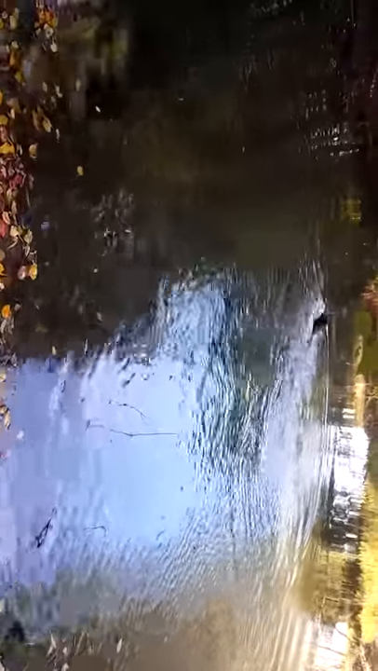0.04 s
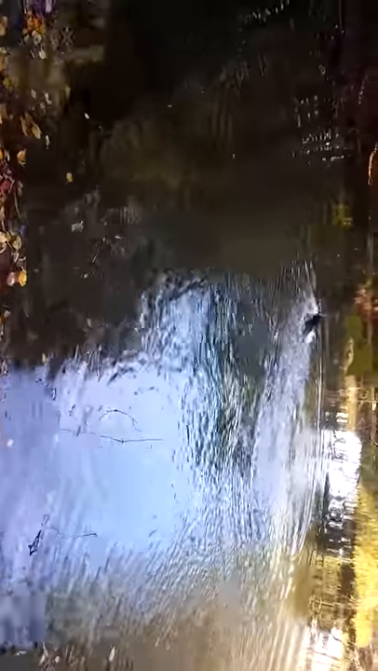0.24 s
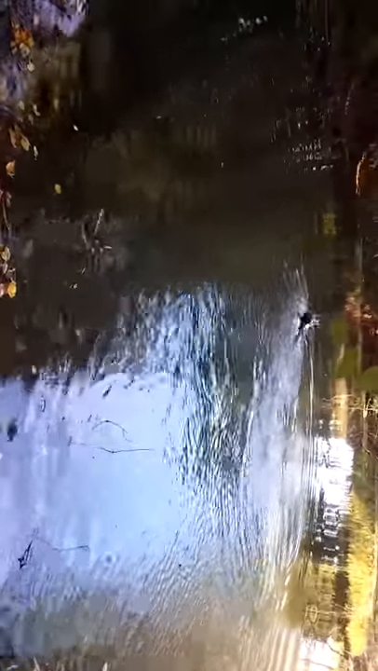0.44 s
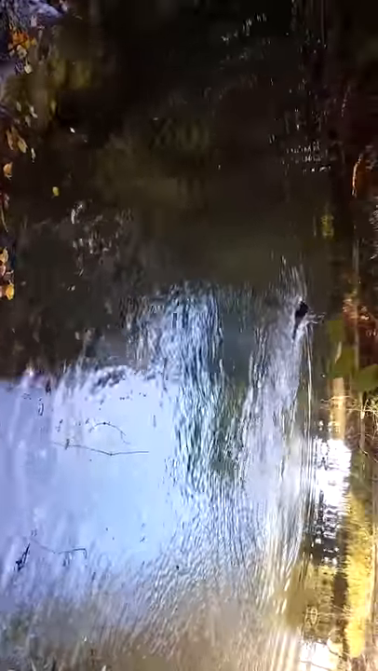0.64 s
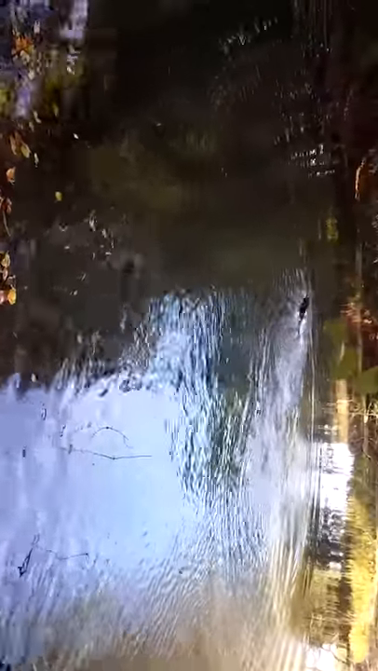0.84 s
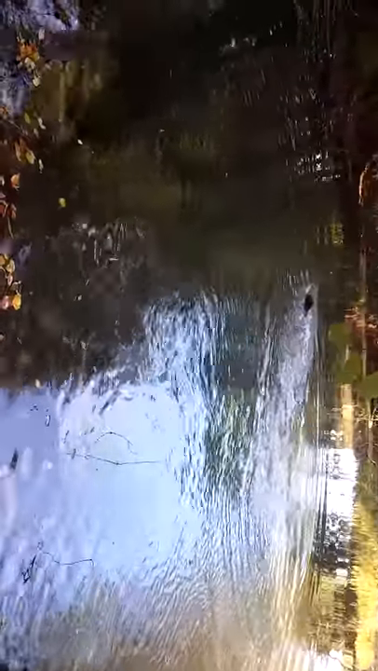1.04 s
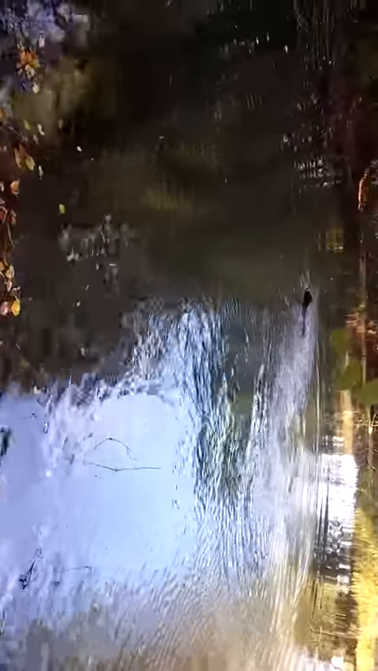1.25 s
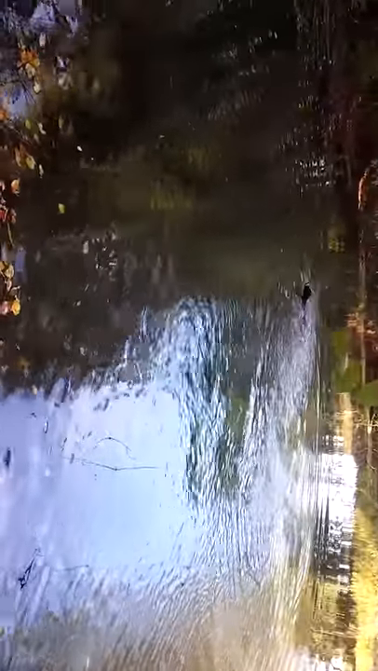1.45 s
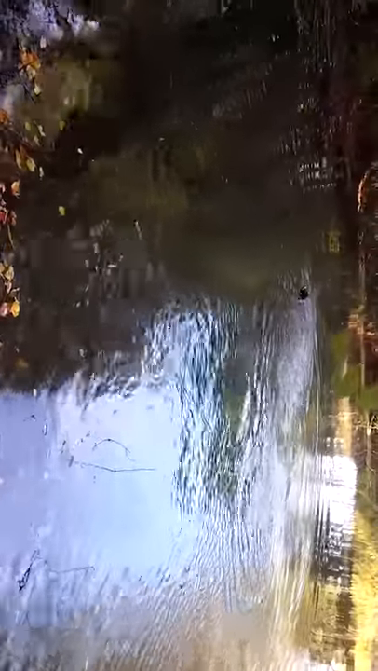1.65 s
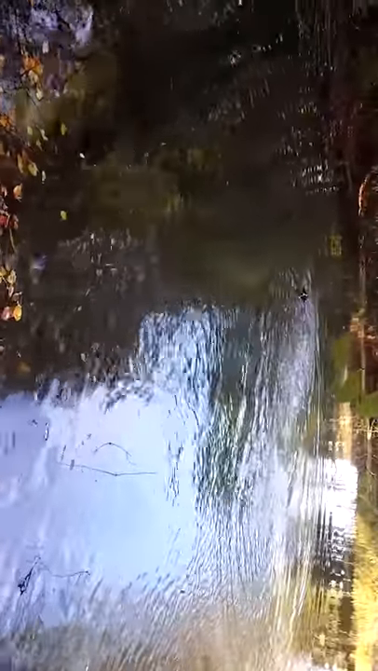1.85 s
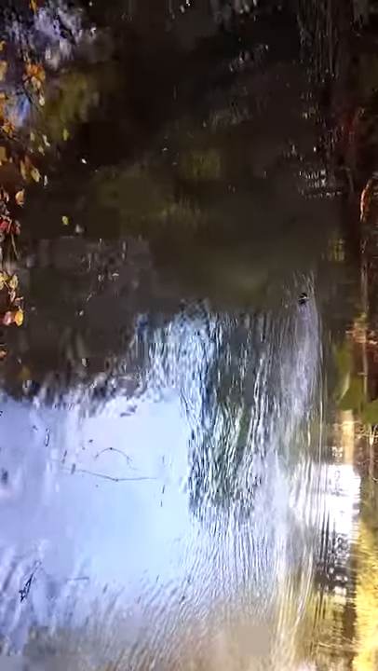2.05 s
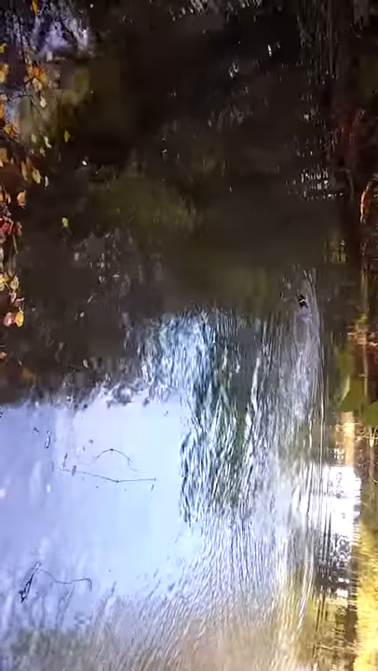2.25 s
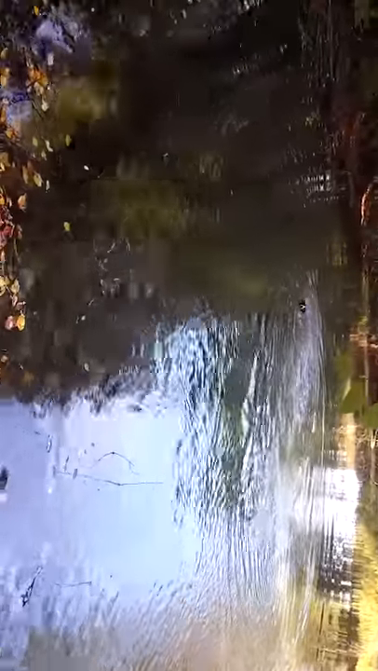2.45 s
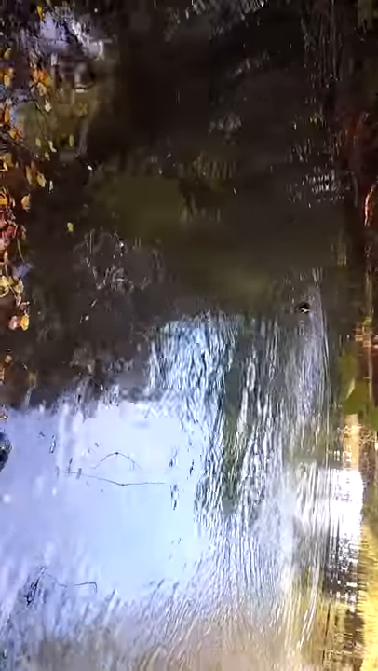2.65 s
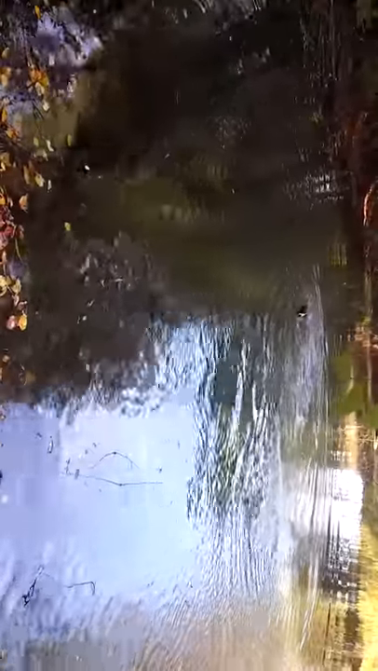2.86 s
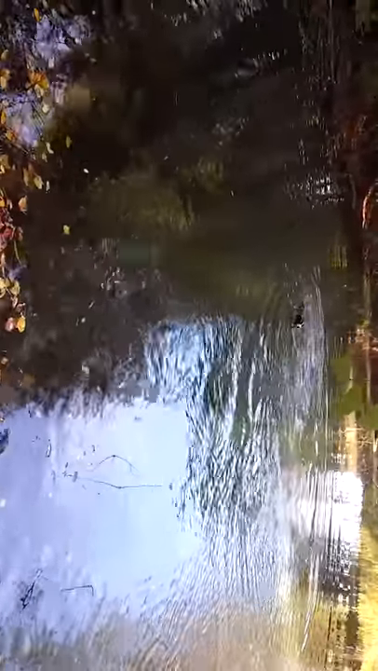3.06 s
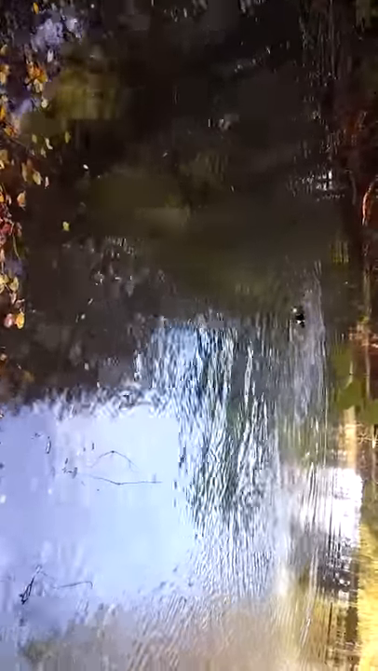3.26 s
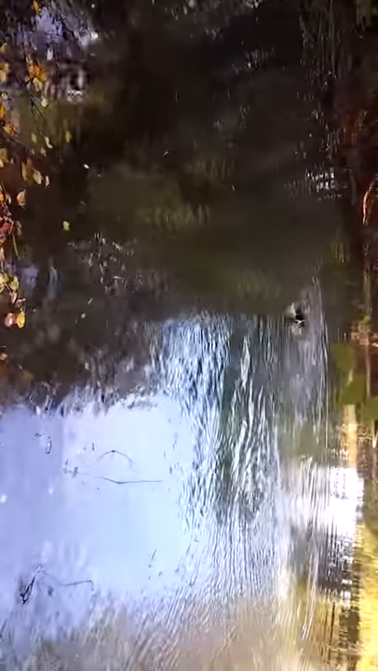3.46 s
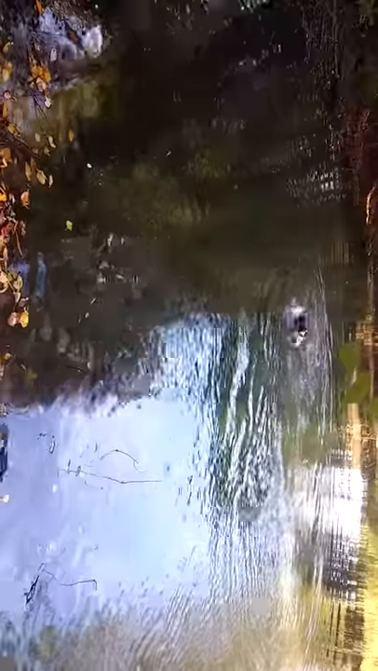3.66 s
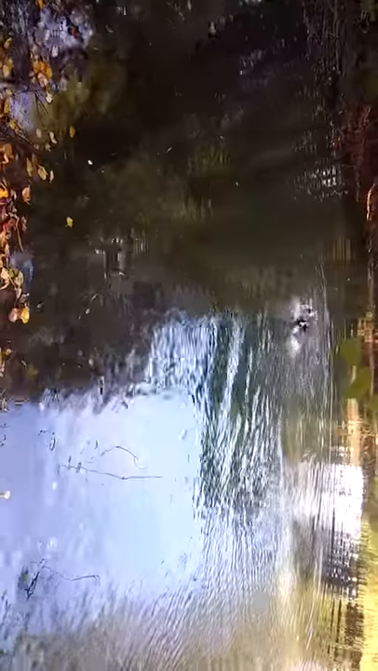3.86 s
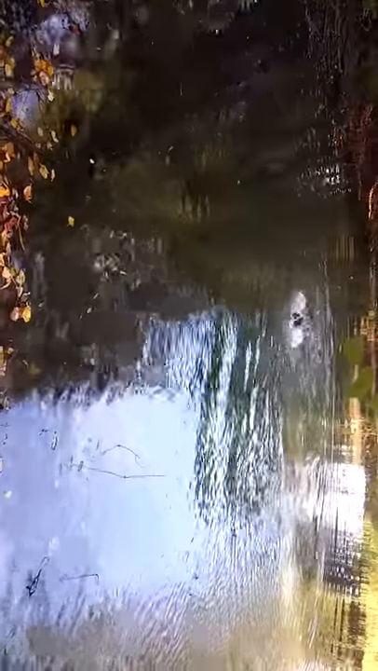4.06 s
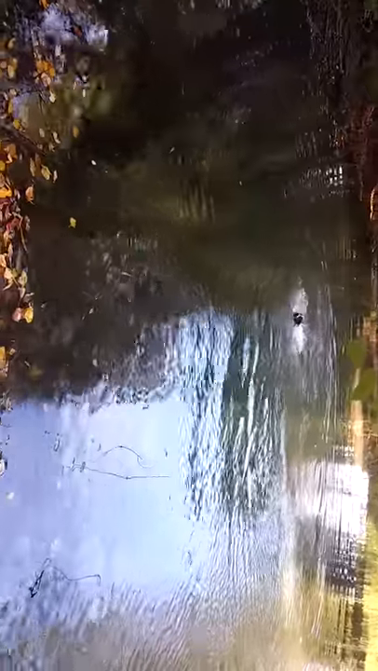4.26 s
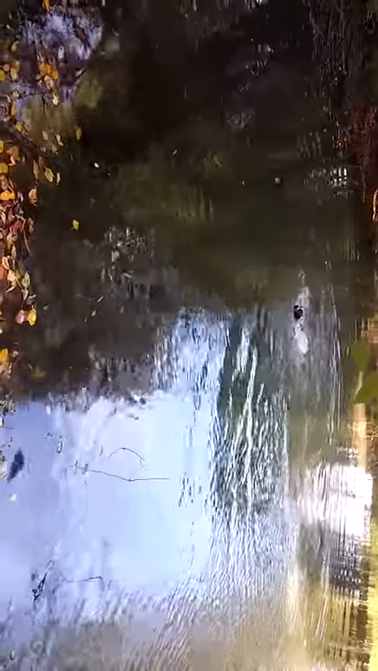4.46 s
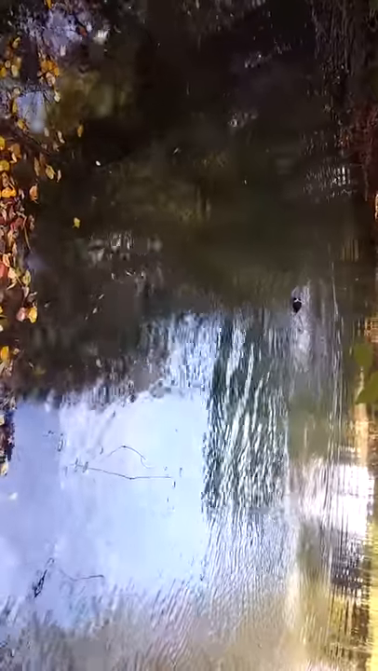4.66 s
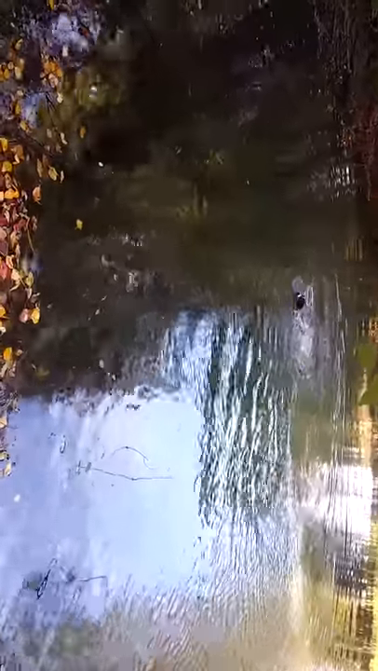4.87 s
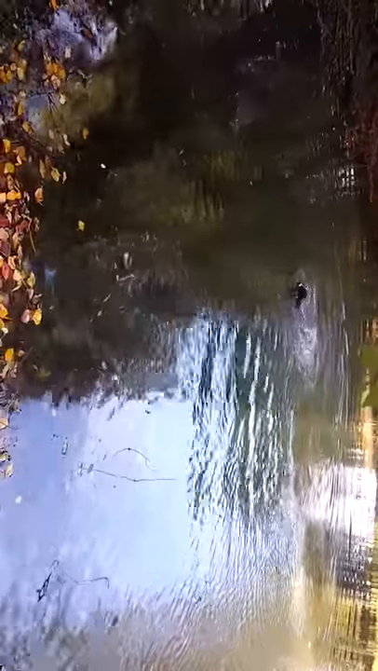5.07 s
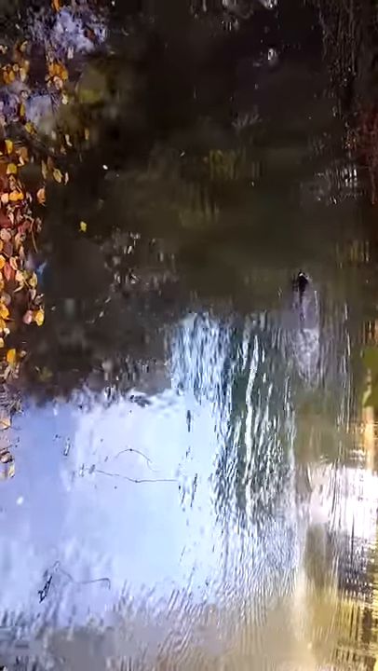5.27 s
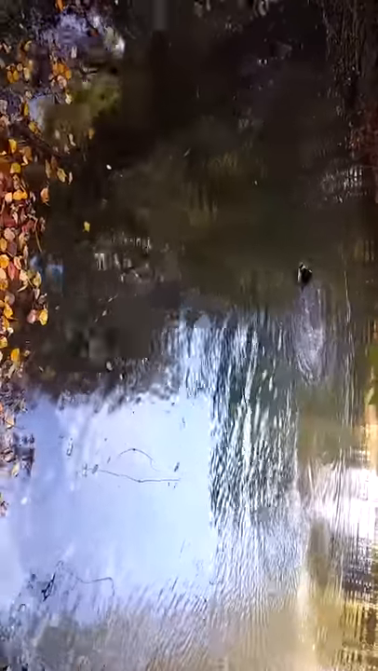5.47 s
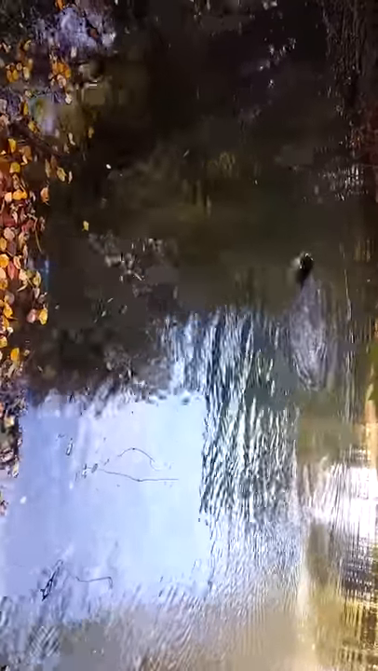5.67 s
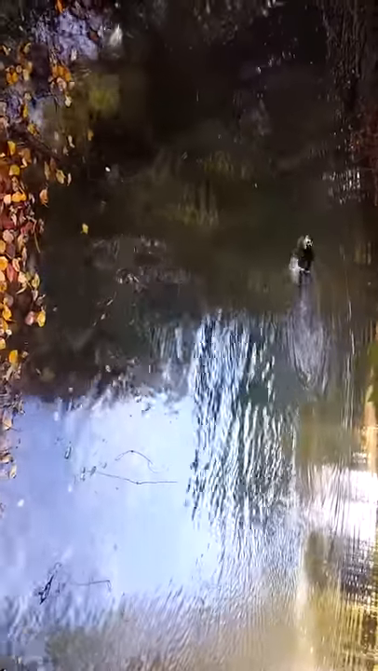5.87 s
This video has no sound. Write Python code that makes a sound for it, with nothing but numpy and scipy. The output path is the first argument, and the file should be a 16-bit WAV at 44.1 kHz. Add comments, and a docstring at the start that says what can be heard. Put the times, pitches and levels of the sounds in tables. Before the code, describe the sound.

Outdoors by a wooded bank, a microphone picks up close, detailed water sounds over faint hush, rumble and barely audible hum. Paddling strokes plop and gurgle, then stop for a quiet glide broken by one short nasal snort from the dog. Small drips lead to the loudest, deepest splash, with spray fizzing back down, a lull of little plops, and a last group of paw strokes.

```python
"""Quick splashes and plops open the scene: a dog paddles across a still pond, heard from the bank.
Each paw stroke is a burst of bubble rings with bright spray, then a gurgling wake and fizzing drops.
Plops are short tones that rise in pitch; deep strokes add a low boom. Once the dog snorts: fluttering
noise through the resonances of its muzzle, and an airy swish follows.
The wooded bank gives a short dull echo; outdoor hush, rumble, hiss and a faint mains hum lie below."""
import sys
import numpy as np
from scipy import signal
from scipy.fft import rfft, irfft
from scipy.io import wavfile

SR = 44100
rng = np.random.default_rng(int(sys.argv[2]) if len(sys.argv) > 2 else 0)


def generate_wav(sig):
    """Save sig (samples, or channels by samples) to the path in sys.argv[1] as 16-bit PCM at SR."""
    pcm = np.round(np.clip(np.atleast_2d(sig).T, -1, 1) * 32767).astype(np.int16)
    wavfile.write(sys.argv[1], SR, pcm)


N = 261072  # length in samples

# In every colour table the levels are relative: only the shape of the spectrum counts.
# outdoor hush, its colour: (f/Hz, level/dB per Hz)
HUSH_COLOUR = [(15, -42), (25, -17), (113, -3), (241, -3.5), (269, -7.5), (299, -1), (324, -9.5),
               (361, -1.5), (448, -6), (486, -6), (1980, -16.5), (2200, -18.5), (2810, -15), (7420, -30),
               (15800, -30)]
# far low rumble: (t/s, level/dB)
RUMBLE_LEVEL = [(0, -65), (1.3, -120), (2.0, -83.5), (2.8, -69), (3.3, -74), (4.0, -67.5), (4.9, -69),
                (5.4, -73), (5.92, -67)]
# colour of the rumble: (f/Hz, level/dB per Hz)
RUMBLE_COLOUR = [(20, -22), (60, -6.5), (140, -4.5), (300, -8.5), (900, -43), (3000, -88)]
# mains hum before its slow wavering: (f/Hz, rms level/dB)
HUM_TONES = [(60, -82), (120, -77), (180, -82), (240, -84.5), (300, -78.5), (360, -99), (480, -83),
             (720, -83.5)]
# paw strokes breaking the surface, each with its strength in water, spray and wake, and the
# swell and 60 dB fall of its splash: (t/s, water level/dB, spray level/dB, wake level/dB, rise/s, t60/s)
PAW_STROKES = [(0.03, -36, -58, -45, 0.042, 0.067), (.124, -53, -83, -46.5, 0.0048, 0.13),
               (0.184, -46, -80, -58.5, 0.011, .16), (0.297, -42, -66, -47.5, 0.0025, 0.25),
               (0.448, -52, -84, -48, .015, .2), (0.658, -46.5, -84, -54, 0.0053, 0.26),
               (0.695, -42.5, -76, -70, 0.004, 0.087), (0.854, -53.5, -84, -54, 0.0036, 0.1),
               (.975, -46.5, -89, -56, 0.033, .1), (1.022, -51.5, -66, -72.5, 0.0043, 0.22),
               (3.134, -56.5, -70, -65, 0.0015, 0.11), (3.596, -63, -66.5, -52.5, 0.011, 0.07),
               (3.728, -33.5, -59.5, -40.5, 0.029, 0.16), (3.87, -48, -67, -46, 0.022, 0.22),
               (3.986, -25.5, -62.5, -58, .008, 0.071), (3.997, -29, -48.5, -54, 0.0088, 0.43),
               (4.065, -34, -46, -60, 0.0063, 0.16), (4.172, -40.5, -78, -42.5, 0.0038, 0.051),
               (4.28, -41, -60.5, -50.5, 0.014, .22), (4.467, -51, -60.5, -57.5, .004, 0.22),
               (4.527, -49.5, -76, -57.5, 0.012, 0.4), (4.67, -59, -89, -70, 0.021, 0.13),
               (4.879, -55, -61.5, -63, 0.013, 0.33), (5.669, -50.5, -64, -50, 0.0016, 0.12),
               (5.729, -42.5, -72, -51, 0.011, 0.095), (5.818, -44.5, -57.5, -50.5, 0.014, 0.25)]
# flicks of fine spray alone: (t/s, level/dB)
SPRAY_FLICKS = [(1.253, -66.5), (3.295, -66), (3.467, -65.5), (3.556, -63), (4.814, -66.5), (4.909, -54.5)]
# colour of the stirred water: (f/Hz, level/dB per Hz)
GURGLE_COLOUR = [(59, -61), (100, 0.5), (189, -4.5), (320, -8), (576, -6.5), (615, 5.5), (799, -2),
                 (1060, 3), (1290, -3), (2000, -3), (2430, -11.5), (2640, -10), (3320, -27.5), (5000, -16),
                 (6500, -81), (11000, -120)]
# colour of the splashing water: (f/Hz, level/dB per Hz)
WATER_COLOUR = [(50, -77), (100, -33), (180, -7.5), (400, 2.5), (560, 6.5), (800, 1), (1300, 4), (2000, 2),
                (2700, -7.5), (3200, -58), (3700, -51), (5000, -89), (7000, -82)]
# colour of flying and falling drops: (f/Hz, level/dB per Hz)
DROP_COLOUR = [(2500, -2), (3950, -9.5), (4900, -2.5), (6200, -3.5), (7300, 0.5), (8800, -12),
               (10300, -14.5), (11200, -21.5), (15500, -22)]
# plops of air pockets large and small, by paws and drops; the rows near 1.03 s together make one
# bright drip; level before PLOP_TONE_DB: (t/s, level/dB, starting f/Hz)
AIR_POCKETS = [(.066, -25.5, 1583), (.128, -24, 590), (.157, -31.5, 1100), (.226, -38, 213),
               (.282, -31, 1204), (.377, -30.5, 644), (.414, -26.5, 634), (.462, -23, 645),
               (.469, -23.5, 592), (.482, -29, 523), (.667, -40.5, 1840), (.704, -30.5, 960),
               (.709, -32, 632), (.905, -46, 860), (.966, -41.5, 2060), (1.024, -31, 953),
               (1.028, -31, 2550), (1.0297, -32.5, 4580), (1.031, -33, 3730), (1.765, -50.5, 574),
               (1.959, -47.5, 2190), (3.143, -39, 2530), (3.398, -51.5, 1690), (3.482, -40, 1070),
               (3.597, -40, 2510), (3.607, -40.5, 1690), (3.622, -36.5, 804), (3.743, -19.5, 640),
               (3.748, -25, 712), (3.764, -22.5, 1380), (3.845, -29.5, 492), (3.902, -27, 1025),
               (3.965, -30, 1410), (3.9865, -14, 966), (4.008, -21, 607), (4.009, -27, 2830),
               (4.024, -23, 414), (4.026, -30, 3000), (4.072, -21.5, 2570), (4.093, -23, 1454),
               (4.173, -33, 606), (4.188, -31, 710), (4.208, -30, 1680), (4.323, -31, 2620),
               (4.533, -34, 1127), (4.553, -36.5, 657), (4.899, -39.5, 2420), (4.95, -37, 1387),
               (5.086, -52.5, 2650), (5.203, -45, 670), (5.487, -41, 630), (5.522, -34.5, 1125),
               (5.675, -34.5, 746), (5.715, -29.5, 1007), (5.778, -28.5, 1050), (5.826, -27, 1004),
               (5.879, -30.5, 1095)]
# deep strokes pull down a cavity that collapses: (t/s, level/dB)
CAVITIES = [(.065, -43), (.124, -42.5), (0.697, -51), (3.738, -41.5), (3.993, -34.5), (4.018, -37.5)]
# loudness curve of the snort: (t/s, level/dB)
SNORT_LEVEL = [(2.204, -80), (2.226, -47.5), (2.239, -39), (2.255, -43.5), (2.275, -39.5), (2.290, -41),
               (2.302, -42.5), (2.312, -51), (2.339, -79)]
# resonances of the muzzle, levels relative: (f/Hz, width/Hz, level/dB)
MUZZLE_RESONANCES = [(608, 42, -10), (1392, 17, 6.5), (1750, 90, 2), (1960, 31, -0.5), (2140, 150, 1.5),
                     (2610, 30, 5.5), (3050, 20, -17), (3450, 110, -24.5), (4200, 270, -23.5)]
# colour of the snort's broad rush of air: (f/Hz, level/dB per Hz)
RUSH_COLOUR = [(300, -22), (850, -16), (1200, -2.5), (2000, -13), (2700, -12), (3000, -12.5),
               (4200, -15.0), (5200, -23.5), (9000, -48)]

HUSH_DB = -66
BANK_T60_S, BANK_CUT_HZ, BANK_DB = 0.34, 6500, -9
LOW_CUT_HZ, CUTOFF_HZ = 40, 15800  # range of the microphone
WAKE_RISE_S, WAKE_T60_S = 0.022, 0.94  # stirred water builds up, then settles
RIPPLE_DB = -77.5  # water lapping round the gliding dog
FLICK_RISE_S, FLICK_T60_S = 0.0032, 0.1
DRIZZLE_RISE_S, DRIZZLE_T60_S = 0.051, 1.0  # spray falls back
FOAM_SHARE = 0.056  # the foam fizzes with this share of the wake's strength
PLOP_RING_S = 0.025  # 60 dB fall of a 1000 Hz plop
PLOP_CLOSE_S, PLOP_TONE_DB = 0.002, 3.5
PLOP_GLIDE_PER_S = 3.3  # rise of pitch per second, as a share of the starting pitch
SLOSH_DB, SLOSH_RISE_S, SLOSH_T60_S = -16, 0.0028, 0.07  # level relative to the plop's own
STRAY_PER_S, STRAY_LOW_HZ, STRAY_HIGH_HZ = 50, 531, 2875
STRAY_DB, STRAY_SPREAD_DB = 5, 1  # level relative to the wake
GULP_HZ = 204
SNORT_FLUTTER = 0.3
SWISH_S, SWISH_DB, SWISH_RISE_S, SWISH_T60_S = 2.495, -63.5, 0.023, 0.41


def from_db(db):
    """Decibels to gain."""
    return 10 ** (np.asarray(db) / 20)


def rms_one(x):
    """Scale to unit rms."""
    return x / np.sqrt(np.mean(x ** 2) + 1e-20)


def level(rows):
    """Gain at every sample from rows of (t/s, level/dB)."""
    s, db = np.transpose(rows)
    return from_db(np.interp(np.arange(N) / SR, s, db))


def coloured(x, spectrum):
    """Shape a steady texture with a spectrum table; rms 1."""
    hz, db = np.transpose(spectrum)
    bins = np.maximum(np.fft.rfftfreq(N, 1 / SR), 1)
    gain = from_db(np.interp(np.log(bins), np.log(hz), db))
    return rms_one(irfft(rfft(x) * gain, N))


def drift(rate):
    """Random wandering with rms 1, taking a new random value `rate` times a second."""
    knots = rng.standard_normal(4000)
    return rms_one(np.interp(np.arange(N) / SR * rate, np.arange(len(knots)), knots))


def resonate(x, hz, width_hz):
    """Two-pole resonance with gain 1 at its peak."""
    r = np.exp(-np.pi * width_hz / SR)
    top = np.array([1, 0, -1]) * (1 - r * r) / 2
    bottom = [1, -2 * r * np.cos(2 * np.pi * hz / SR), r * r]
    return signal.lfilter(top, bottom, x)


def noise_band(length, hz, width_hz):
    """Noise passed twice through one resonance, so it keeps mainly a band round one pitch."""
    return resonate(resonate(rng.standard_normal(length), hz, width_hz), hz, width_hz)


def add(out, s, sound):
    """Mix a sound in at a time in seconds."""
    at = int(s * SR)
    out[at:at + len(sound)] += sound[:N - at]


def swell_and_fall(t, rise, t60):
    """Gain that climbs in a straight line, then falls 60 dB in t60 seconds."""
    return np.minimum(t / rise, 1) * from_db(-60 * np.maximum(t - rise, 0) / t60)


def bursts(rows):
    """Gain from rows of (t/s, level/dB, rise/s, t60/s); overlapping bursts sum their powers."""
    power, t = np.zeros(N), np.arange(2 * SR) / SR
    for s, db, rise, t60 in rows:
        add(power, s, (from_db(db) * swell_and_fall(t, rise, t60)) ** 2)
    return np.sqrt(power)


def bubble_cloud(low_hz, high_hz, per_s, spread_db, damping, wash, count=24):
    """Bubbles of random strength ring briefly at pitches spread over a range, over a smooth wash."""
    strengths = from_db(spread_db * np.minimum(rng.exponential(1, N), 3.5)) * rng.choice([-1, 1], N)
    clicks = strengths * (rng.random(N) < per_s / SR)
    dealt = rng.integers(0, count, N)  # which pitch each click sets ringing
    air = rng.standard_normal(N)
    rings = np.zeros(N)
    for k, hz in enumerate(np.geomspace(low_hz, min(high_hz, 0.45 * SR), count)):
        rings += resonate(clicks * (dealt == k) + 1e-12 * air, hz, damping * hz)
    return rms_one(rings) + wash * air * np.sqrt(SR / 2 / high_hz)


def background(hiss_db=-81.5, hiss_hz=7600, hiss_width_hz=1800, hum_waver_db=3.0):
    """Outdoor hush, a slowly swelling rumble and a thin high hiss are noise; mains hum is sine tones."""
    t = np.arange(N) / SR
    hush = from_db(HUSH_DB) * coloured(rng.standard_normal(N), HUSH_COLOUR)
    rumble = level(RUMBLE_LEVEL) * coloured(rng.standard_normal(N), RUMBLE_COLOUR)
    hiss = from_db(hiss_db) * rms_one(noise_band(N, hiss_hz, hiss_width_hz))
    hum = np.zeros(N)
    for hz, db in HUM_TONES:
        gain = from_db(db + hum_waver_db * drift(4.2))
        hum += gain * np.sqrt(2) * np.sin(2 * np.pi * (hz * t + rng.random()))
    return hush + rumble + hiss + hum


def bank(x):
    """Trunks and the bank scatter many small dull echoes."""
    t = np.arange(SR // 2) / SR
    hits = rng.standard_normal(len(t)) * (rng.random(len(t)) < 1500 / SR) * (t > 0.005)
    echoes = hits * from_db(-60 * t / BANK_T60_S)
    dull = signal.butter(2, BANK_CUT_HZ, fs=SR, output="sos")
    echoes = signal.sosfilt(dull, echoes / np.linalg.norm(echoes))
    return from_db(BANK_DB) * signal.fftconvolve(x, echoes)[:N]


def swish(centre_hz=7600, width_hz=1700):
    """A thin, airy swish after the snort: one burst of high noise."""
    air = rms_one(noise_band(N, centre_hz, width_hz))
    return bursts([(SWISH_S, SWISH_DB, SWISH_RISE_S, SWISH_T60_S)]) * air


def snort(rush_db=-6):
    """A short blast of air, fluttering in wet nostrils, excites the muzzle over a broad rush."""
    jet = rng.standard_normal(N) * (1 + SNORT_FLUTTER * drift(220))
    hollow = np.zeros(N)
    for k, (hz, width, db) in enumerate(MUZZLE_RESONANCES):
        hollow += (-1) ** k * from_db(db) * resonate(jet, hz, width)  # neighbours have opposite sign
    hollow = rms_one(signal.sosfilt(signal.butter(2, 4200, fs=SR, output="sos"), hollow))
    rush = coloured(jet, RUSH_COLOUR)
    return level(SNORT_LEVEL) * (hollow + from_db(rush_db) * rush)


def wake(opening_db=-49):
    """How strongly the water is stirred: already moving at the start, and stirred anew by each stroke."""
    opening = from_db(opening_db - 60 * np.arange(N) / SR / WAKE_T60_S)
    stirred = bursts([(s, db, WAKE_RISE_S, WAKE_T60_S) for s, _, _, db, _, _ in PAW_STROKES])
    return np.sqrt(opening ** 2 + stirred ** 2 + from_db(RIPPLE_DB) ** 2)


def drizzle(stir, drizzle_db=-12.0, foam_db=-83):
    """Tiny drops fall back after each stroke's spray, and foam fizzes on the wake."""
    fizz = bubble_cloud(1920, 13900, per_s=2200, spread_db=0.0, damping=0.097, wash=1.0)
    falling = bursts([(s, db + drizzle_db, DRIZZLE_RISE_S, DRIZZLE_T60_S)
                      for s, _, db, _, _, _ in PAW_STROKES])
    strength = np.hypot(falling, FOAM_SHARE * stir) + from_db(foam_db)
    return strength * coloured(fizz, DROP_COLOUR)


def churn(stir, churn_db=-0.5, surge_db=3.5):
    """Stirred water gurgles with overlapping bubbles, in small surges; it settles as the dog glides."""
    gurgle = bubble_cloud(143.0, 3755, per_s=1300, spread_db=0.5, damping=0.11, wash=0.15, count=36)
    surges = from_db(churn_db + surge_db * drift(60))
    return surges * stir * coloured(gurgle, GURGLE_COLOUR)


def stray_plops(stir, count=360):
    """More air pockets close at random, following the wake: rows of (t/s, level/dB, starting f/Hz)."""
    gap, size, pitch = rng.random((count, 3)).T
    times = np.cumsum(2 * gap) / STRAY_PER_S
    rows = []
    for s, a, b in zip(times, size, pitch):
        if s * SR < N:
            wake_db = 20 * np.log10(stir[int(s * SR)])
            db = wake_db + STRAY_DB + STRAY_SPREAD_DB * np.sqrt(3) * (2 * a - 1)
            rows.append((s, db, STRAY_LOW_HZ * (STRAY_HIGH_HZ / STRAY_LOW_HZ) ** b))
    return rows


def plops(rows, slosh_width=0.36, lead=0.02):
    """Each air pocket swells as it closes, rings down and rises in pitch; water sloshes round it."""
    out, t = np.zeros(N), np.arange(SR // 8) / SR - lead  # the slosh begins before the ring
    age = np.maximum(t, 0)
    for s, db, hz in rows:
        t60 = PLOP_RING_S * (hz / 1000) ** -0.35  # big bubbles ring longer
        envelope = (1 - np.exp(-(age / PLOP_CLOSE_S) ** 2)) * from_db(PLOP_TONE_DB - 60 * age / t60)
        tone = envelope * np.sin(2 * np.pi * hz * (age + PLOP_GLIDE_PER_S * age ** 2 / 2))
        water = rms_one(noise_band(len(t), hz, slosh_width * np.sqrt(hz * 1000)))
        build_up = np.exp(np.minimum(t, 0) / SLOSH_RISE_S)
        slosh = water * build_up * from_db(SLOSH_DB - 60 * age / SLOSH_T60_S)
        add(out, max(s - lead, 0), from_db(db) * (tone + slosh))
    return out


def gulps(rise_s=0.0039, t60=0.15, width=0.34):
    """A collapsing cavity gives a low, rough boom: a short burst of noise round one low pitch."""
    out, t = np.zeros(N), np.arange(SR // 4) / SR
    shape = swell_and_fall(t, rise_s, t60)
    for s, db in CAVITIES:
        boom = noise_band(2 * len(t), GULP_HZ, width * GULP_HZ)[len(t):]  # skip the filter's start
        add(out, s, from_db(db) * shape * rms_one(boom))
    return out


def splashes():
    """A paw tears the surface into a dense burst of bubbles and throws bright spray."""
    water = bursts([(s, db, rise, t60) for s, db, _, _, rise, t60 in PAW_STROKES])
    thrown = [(s, db, rise, t60) for s, _, db, _, rise, t60 in PAW_STROKES]
    flicked = [(s, db, FLICK_RISE_S, FLICK_T60_S) for s, db in SPRAY_FLICKS]
    spray = bursts(thrown + flicked)
    bubbles = bubble_cloud(114.5, 3840, per_s=4200, spread_db=3.0, damping=0.2, wash=0.3, count=32)
    drops = bubble_cloud(2250, 10700, per_s=4600, spread_db=8.5, damping=0.13, wash=0.78)
    return water * coloured(bubbles, WATER_COLOUR) + spray * coloured(drops, DROP_COLOUR)


def scene(snort_echo=0.66):
    """The swimming dog, its echo and the quiet pond."""
    stir = wake()
    water = gulps() + splashes() + churn(stir)
    nose = snort()
    no_echo = drizzle(stir) + swish() + background()
    water = water + plops(AIR_POCKETS + stray_plops(stir))
    echo = bank(water + snort_echo * nose)
    return (water + nose + echo + no_echo)[None]


def record(dry):
    """The microphone drops the deep bass and the very top."""
    dry = signal.sosfilt(signal.butter(2, LOW_CUT_HZ, "high", fs=SR, output="sos"), dry)
    return signal.sosfilt(signal.ellip(10, 0.1, 70, CUTOFF_HZ, fs=SR, output="sos"), dry)


dry = scene()
out = record(dry)
generate_wav(out)
```